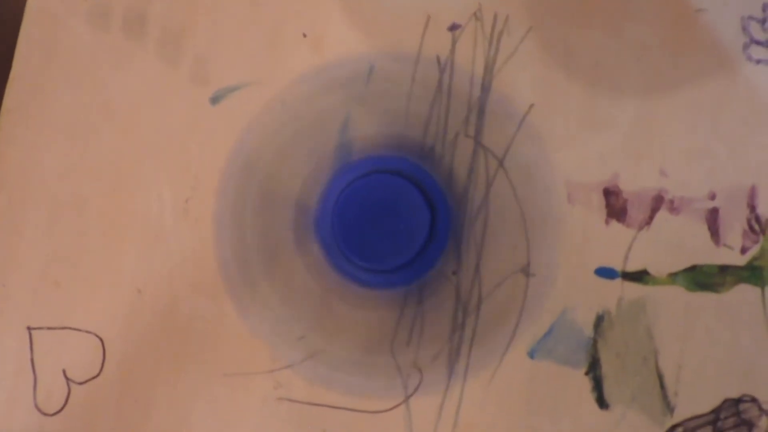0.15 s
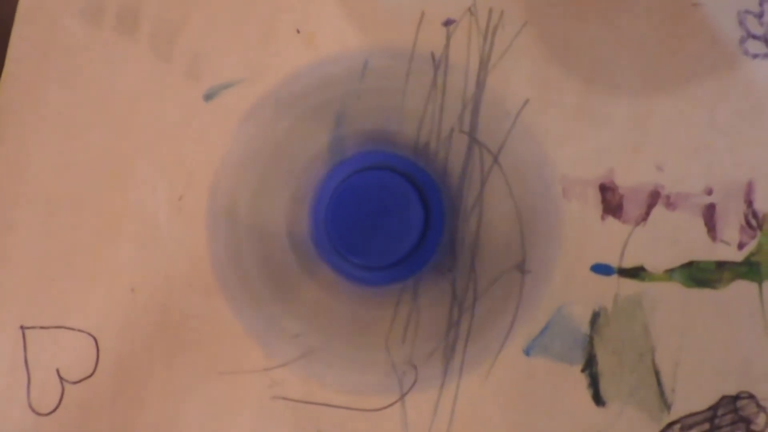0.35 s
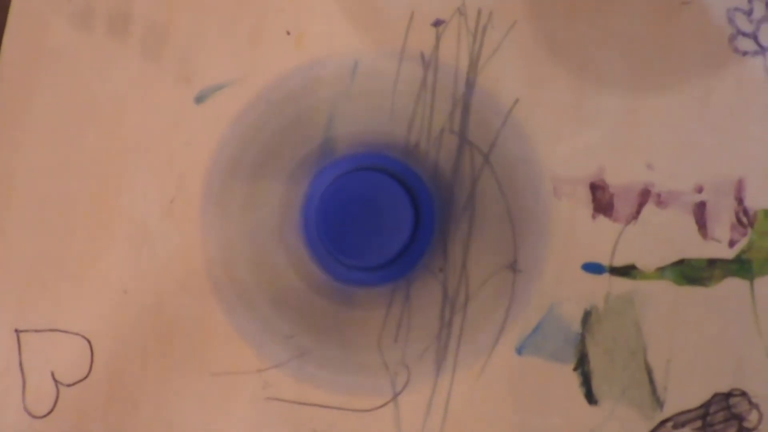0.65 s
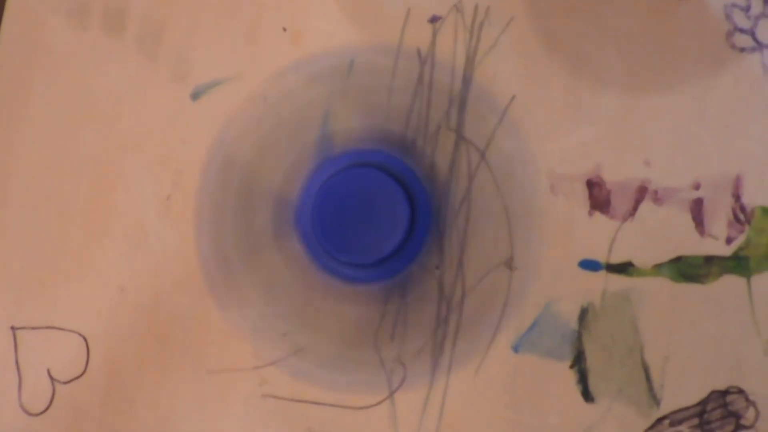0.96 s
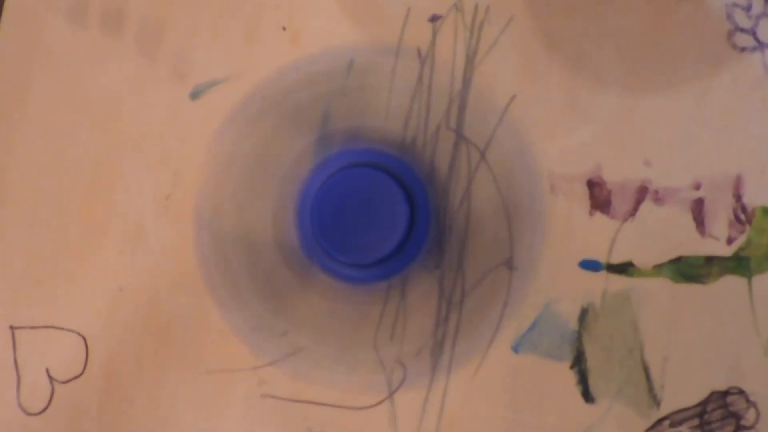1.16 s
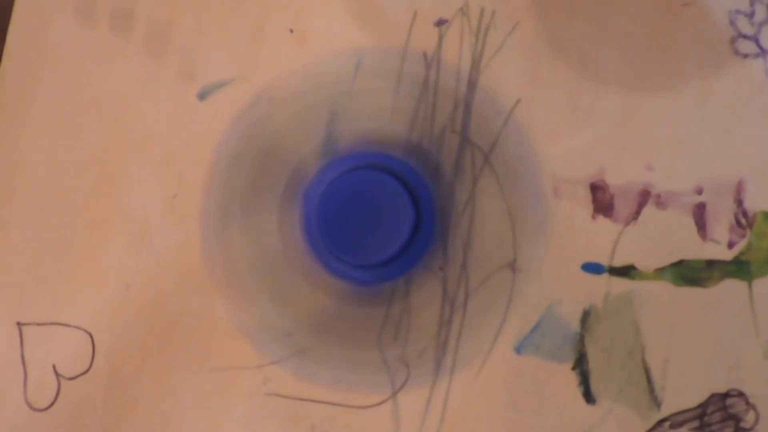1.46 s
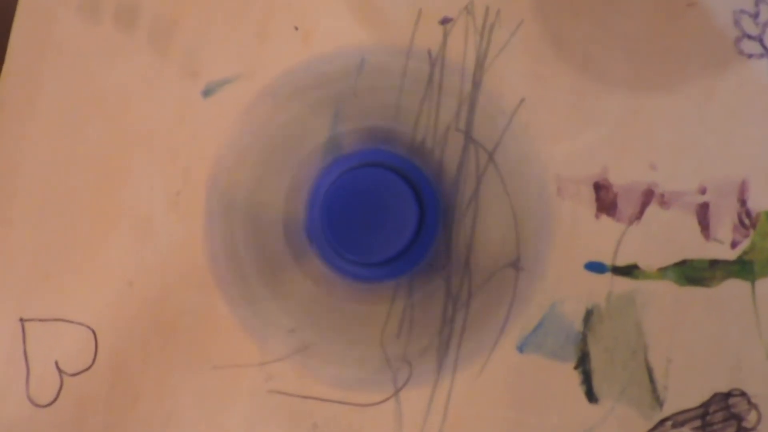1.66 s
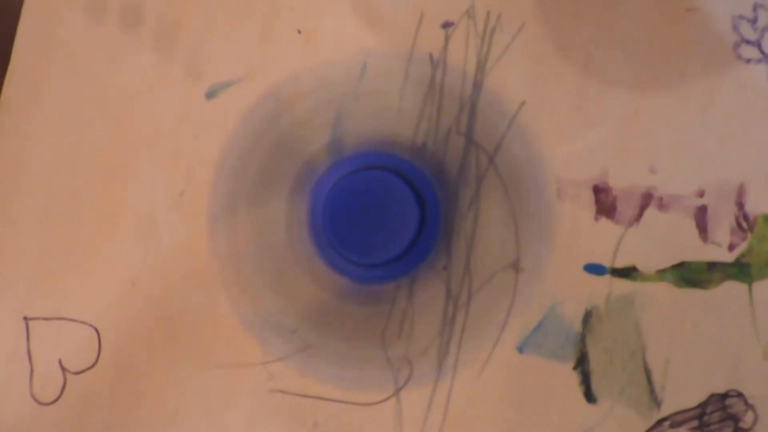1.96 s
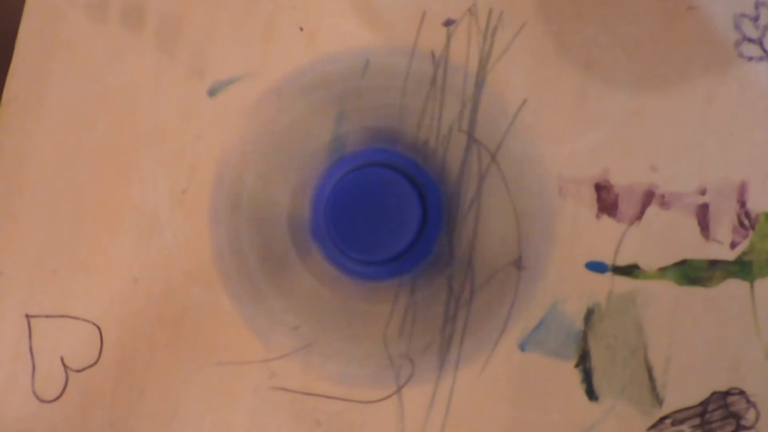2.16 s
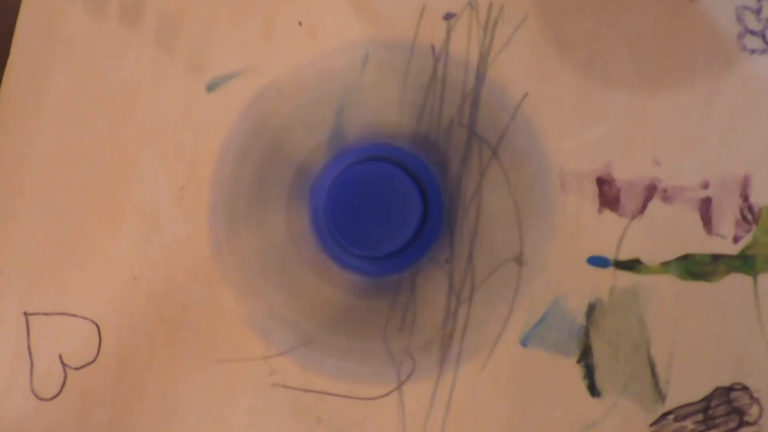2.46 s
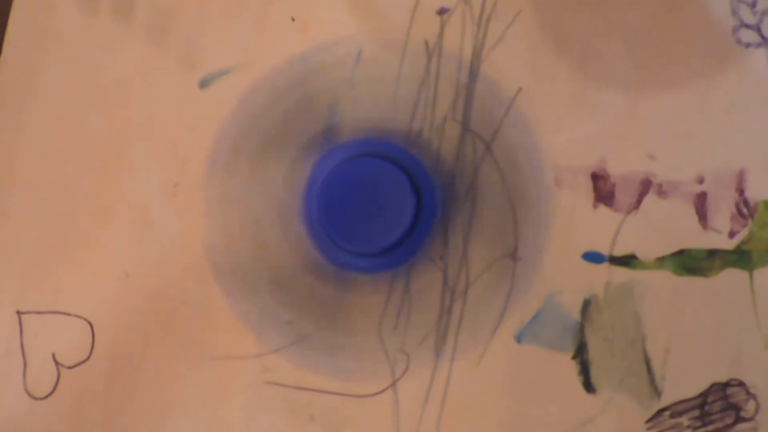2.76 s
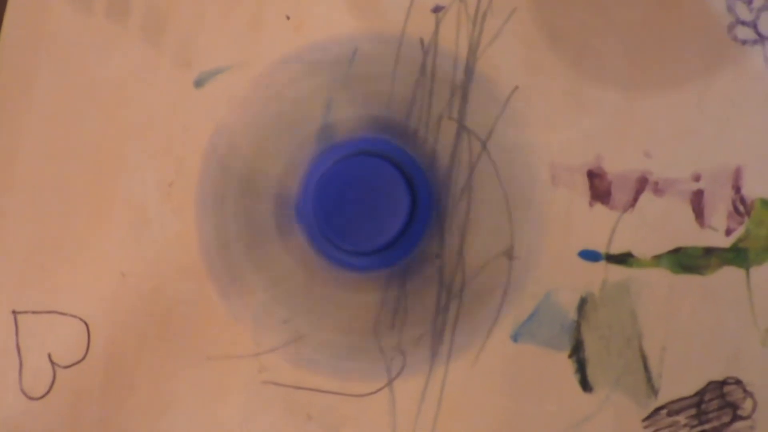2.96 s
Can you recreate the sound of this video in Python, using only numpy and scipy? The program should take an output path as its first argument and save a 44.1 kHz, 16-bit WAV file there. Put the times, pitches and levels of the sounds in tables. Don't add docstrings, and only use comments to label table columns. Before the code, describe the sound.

A small toy spinner whirs steadily on a wooden table, gritty and buzzing, in a quiet room

```python
import sys
import numpy as np
from scipy import signal
from scipy.fft import rfft, irfft
from scipy.io import wavfile
from scipy.ndimage import uniform_filter1d

SR = 44100
rng = np.random.default_rng(int(sys.argv[2]) if len(sys.argv) > 2 else 0)


def convert_level_to_amplitude(level_db):
    exponent = np.asarray(level_db, float) / 20
    return 10 ** exponent


def digitize_waveform(pressure):
    field = np.atleast_2d(pressure).T
    bounded = np.clip(field, -1, 1)
    quanta = np.round(bounded * 32767).astype(np.int16)
    wavfile.write(sys.argv[1], SR, quanta)


N = 136710


def level(x, db):
    return x * convert_level_to_amplitude(db) / np.sqrt(np.mean(x ** 2))


def walk(rate_hz):
    hold = int(SR / rate_hz)
    values = rng.standard_normal(2 ** 12)[:N // hold + 1]
    steps = np.repeat(values, hold)
    smooth = uniform_filter1d(uniform_filter1d(steps, hold), hold)[:N]
    return (smooth - smooth.mean()) / smooth.std()


def along(points, hz):
    p = np.array(points)
    return np.interp(np.log(hz + 1), np.log(p[:, 0]), p[:, 1])


def pair(shared, left, right, likeness):
    coherence = np.clip(likeness, 0, 1)
    separate = rfft(np.array([left, right]))
    return np.sqrt(coherence) * rfft(shared) + np.sqrt(1 - coherence) * separate


def room(t, hz):
    # frequency_hz, density_db
    colour = [(4, -3), (20, -0.5), (42, -8), (70, 0), (124, -7.5), (260, -5), (330, -8.5), (450, -10.5),
              (600, -33.5)]
    # frequency_hz, level_db
    hum_tones = [(29.9, -65.3), (59.8, -69.5)]
    likeness, swell_db, rumble_db = .58, 1.5, -58.5
    noise = pair(*rng.standard_normal((3, N)), likeness) * convert_level_to_amplitude(along(colour, hz))
    swell = convert_level_to_amplitude(swell_db * walk(rate_hz=3.97))
    rumble = level(irfft(noise, N) * swell, rumble_db)
    hum = sum(convert_level_to_amplitude(db) * np.sqrt(2) * np.sin(2 * np.pi * f * t) for f, db in hum_tones)
    return rumble + hum


def echoes():
    t60_s, echo_db = .08, -8
    lag = np.arange(4096) / SR
    tail = rng.standard_normal((2, len(lag))) * convert_level_to_amplitude(-60 * lag / t60_s)
    tail = convert_level_to_amplitude(echo_db) * tail / np.sqrt(np.sum(tail ** 2, axis=1, keepdims=True))
    return 1 + rfft(tail, N)


def hiss(colour, db, likeness, hz):
    ear_lag_s, swell_db, flicker_db = .00002, .5, 1.3
    edge_hz = np.array(colour)[-1, 0]
    noise = pair(*rng.standard_normal((3, N)), likeness) * convert_level_to_amplitude(along(colour, hz))
    noise = noise * echoes() / (1 + (hz / edge_hz) ** 20)
    noise = noise * np.exp(1j * np.pi * hz * ear_lag_s * np.array([[1], [-1]]))
    out = 0
    swell = walk(rate_hz=30)
    for step in range(10):
        share = np.clip(1 - np.abs(6 * np.log2((hz + 1) / edge_hz) + step), 0, 1)
        flicker = walk(rate_hz=26)
        flicker = flicker - uniform_filter1d(flicker, size=SR // 5)
        out = out + convert_level_to_amplitude(swell_db * swell + flicker_db * flicker) * irfft(noise * share, N)
    return level(out, db)


def air_hiss(late, hz):
    # frequency_hz, density_db
    colour = [(8900, -42), (9500, -4), (10400, -4.5), (11400, -8), (12300, -6.5), (14100, -4), (15000, -4),
              (16500, -2)]
    fade_db_per_s = .5
    return convert_level_to_amplitude(-fade_db_per_s * late) * hiss(colour, db=-63, likeness=.3, hz=hz)


def ball_hiss(late, hz):
    # frequency_hz, density_db
    colour = [(3250, 1), (3700, 2.5), (4400, -3), (5000, -1), (6400, -3), (7200, -6.5), (8200, -10.5),
              (9300, 2)]
    fade_db_per_s = .3
    return convert_level_to_amplitude(-fade_db_per_s * late) * hiss(colour, db=-57.5, likeness=.55, hz=hz)


def cage_beat(turn):
    beats = [
        (.382, .042, .6),
        (1, .04, -2.9),
        (2, .035, -1.6),
    ]
    return 1 + sum(depth * np.cos(k * turn + angle) for k, depth, angle in beats)


def rolling(turn, hz):
    wobbles = [(1, .08, 1.6), (2, .07, -2.6), (3, .08, .1)]
    # frequency_hz, width_hz, left_db, right_db
    ring_modes = [(449, 49, -20.0, -18.8), (505, 61, -22.5, -20.2), (655, 218, -14.0, -15.0),
                  (763, 68, -5.9, -5.5), (860, 49, -5.8, -12.7), (908, 45, -7.3, -8.0),
                  (990, 80, -9.9, -11), (1095, 70, -4.3, -5.5), (1225, 45, -16.4, -10.3),
                  (1323, 58, -.2, -4.0), (1378, 177, -22.8, -13.7), (1522, 86, -6.4, -13),
                  (1635, 87, -12.3, -13.7), (1744, 80, -7.3, -5.4),
                  (1843, 77, -11.1, -12.4), (1946, 94, -10.2, -10.7), (2017, 61, -5.4, -12.4),
                  (2117, 259, -12.9, -13.6), (2312, 132, -9.4, -20.4), (2348, 90, -13.5, -11.6),
                  (2497, 96, -6.6, -10.6), (2638, 85, -14.3, -21.8), (2712, 85, -12.4, -11.6),
                  (2822, 95, -12.9, -11.6), (2935, 92, -18.7, -11.2), (3084, 259, -22.8, -23.0),
                  (3206, 179, -17.7, -24.2), (3417, 145, -27.8, -37.8)]
    # frequency_hz, likeness_0_to_1
    ear_likeness = [(400, .9), (700, .985), (1250, .96), (1450, .7), (1750, .85), (2050, .55), (2600, .75),
                    (3300, .5)]
    # frequency_hz, phase_rad
    ear_phase = [(1500, 0), (1650, .8), (1900, .4), (2560, .3), (2650, 2.6), (2760, 2.6), (2830, .5),
                 (3300, 1.5)]
    # (frequency_hz, depth_0_to_1, angle_rad)
    beams = [
        (1, [(1180, 0, 0), (1320, .24, -1.6), (1500, 0, 0), (1800, .09, 3), (2000, .16, 2.5), (2550, .18, 2.4), (2750, .08, -1)]),
        (.24, [(1600, 0, 0), (1800, .08, 2.8), (2550, .13, 2.8), (2700, 0, 0)]),
        (.62, [(2100, 0, 0), (2300, .07, 1.2), (2500, .15, 2.1), (2700, 0, 0)]),
        (.013, [(2400, 0, 0), (2460, .24, -2.05), (2560, .24, -2.05), (2640, 0, 0)]),
    ]
    grit_db, grit_hz, drift_db, speck_db = 1.5, 1200, .1, 4.5
    wobble = 1 + sum(depth * np.cos(round(k) * turn + angle) for k, depth, angle in wobbles)
    roughness_db = grit_db * walk(grit_hz) + drift_db * walk(rate_hz=7.6)
    force = wobble * convert_level_to_amplitude(roughness_db + speck_db * rng.standard_normal(N))
    drive = pair(*(force * rng.standard_normal((3, N))), along(ear_likeness, hz))
    rings = 0
    for k, (f, width, left, right) in enumerate(ring_modes):
        resonance = (1j * hz * width / (f ** 2 - hz ** 2 + 1j * hz * width)) ** 2
        rings = rings + (-1) ** k * convert_level_to_amplitude(np.array([[left], [right]])) * resonance
    sound = drive * rings * np.exp(.5j * along(ear_phase, hz) * np.array([[1], [-1]]))
    out = irfft(sound, N)
    for k, points in beams:
        for part in np.cos, np.sin:
            depth = along([(f, d * part(-angle)) for f, d, angle in points], hz)
            out = out + part(k * turn) * irfft(sound * depth, N)
    return level(out, db=-40)


def races(turn):
    race_orders = [7, 8, 9, 10, 12, 14, 15, 17, 18, 19, 20, 22, 24, 25, 26, 29, 30, 35, 44]
    race_db = [-70, -75, -65, -69, -66.5, -75, -76, -70, -69, -74, -69, -73, -75, -61, -69, -66, -53, -64,
               -59.5]
    ball_orders = [10.62, 11.62, 18.62, 20.6, 21.6, 22.6, 24.27, 26.27, 27.27, 30.27, 31.27, 32.01, 33.01,
                   33.83, 34.27, 35.27, 37.27, 38.27, 39.27, 39.83, 40.27, 40.5, 41.27, 43.27, 45.27, 46.27,
                   46.5, 47.27, 48.27, 49.27, 52.27, 54.27, 55.27, 70.87]
    ball_db = [-80, -77, -75, -76, -76, -75, -73, -67, -68, -62, -61, -63, -70, -69, -63, -66, -61, -69,
               -67, -67, -62, -67, -66, -62, -66, -66, -67, -72, -73, -70, -66, -63, -65, -66]
    wander_db, wander_hz = 1.1, 4
    race_slip_rad, ball_slip_rad = .006, .007
    trains = (race_orders, race_db, race_slip_rad), (ball_orders, ball_db, ball_slip_rad)
    out = np.zeros(N)
    for orders, levels_db, slip in trains:
        for order, db in zip(orders, levels_db):
            angle = 2 * np.pi * rng.random() + order * (turn + slip * walk(wander_hz))
            out += convert_level_to_amplitude(db + wander_db * walk(wander_hz)) * np.sqrt(2) * np.sin(angle)
    return out


def even(x):
    evenness = .6
    window = int(.035 * SR)
    power = uniform_filter1d(uniform_filter1d(np.mean(x ** 2, axis=0), window), window)
    return x * (power.mean() / power) ** (evenness / 2)


def scene():
    turn_hz, slowing_hz_per_s, balance_db = 25.34, .49, .5
    t = np.arange(N) / SR
    hz = np.arange(N // 2 + 1) * SR / N
    late = t - t.mean()
    turn = 2 * np.pi * (turn_hz * t - slowing_hz_per_s * t ** 2 / 2)
    balance = convert_level_to_amplitude(np.array([[balance_db], [-balance_db]]) / 2)
    background = room(t, hz) * balance
    friction = cage_beat(turn) * (air_hiss(late, hz) + ball_hiss(late, hz))
    whirr = even(rolling(turn, hz) + races(turn) * balance)
    return background + friction + whirr


def band_limit(x):
    return signal.sosfilt(signal.butter(12, 15740, fs=SR, output="sos"), x)


def record(dry):
    return band_limit(dry)


dry = scene()
out = record(dry)
digitize_waveform(out)
```